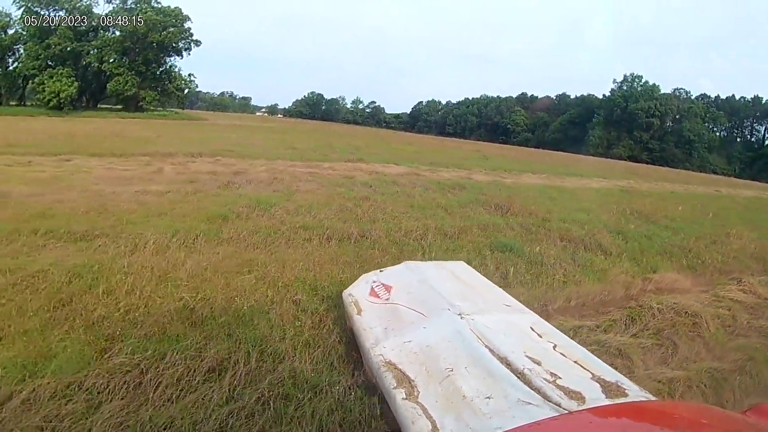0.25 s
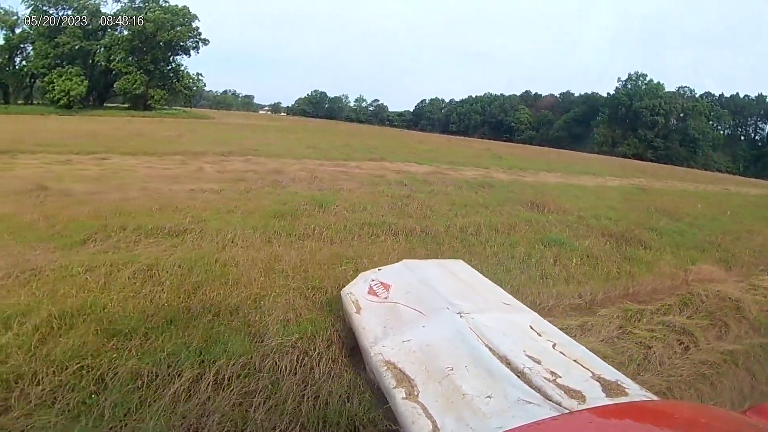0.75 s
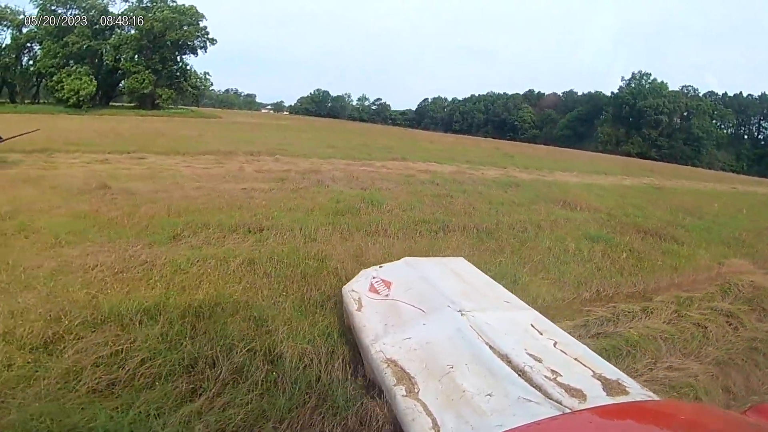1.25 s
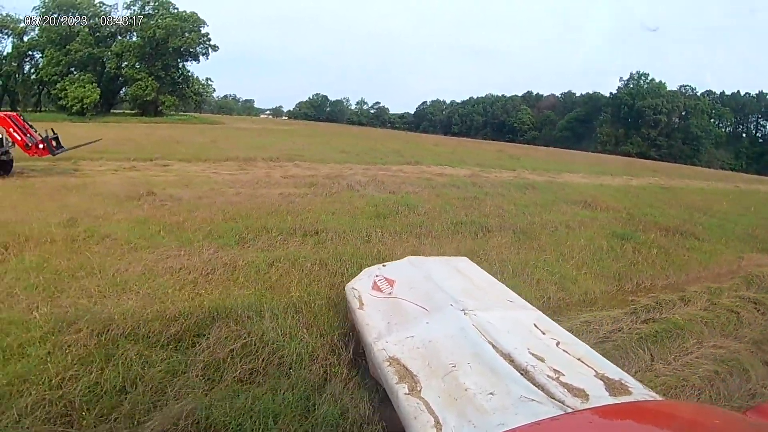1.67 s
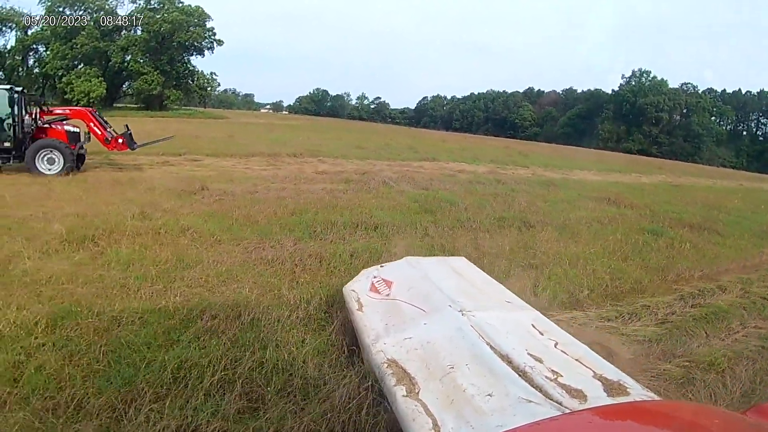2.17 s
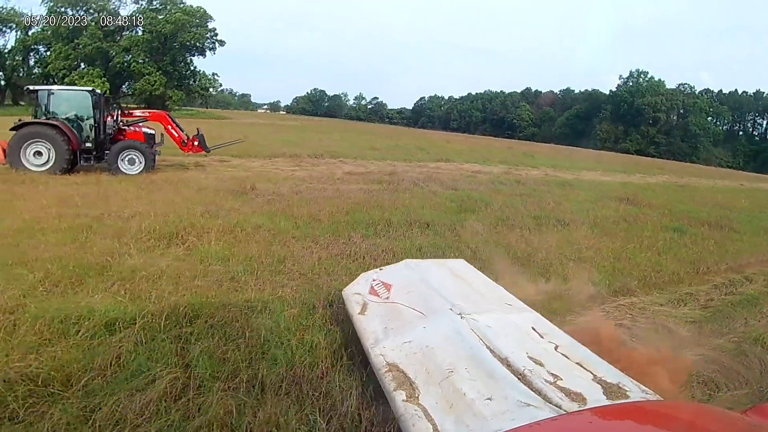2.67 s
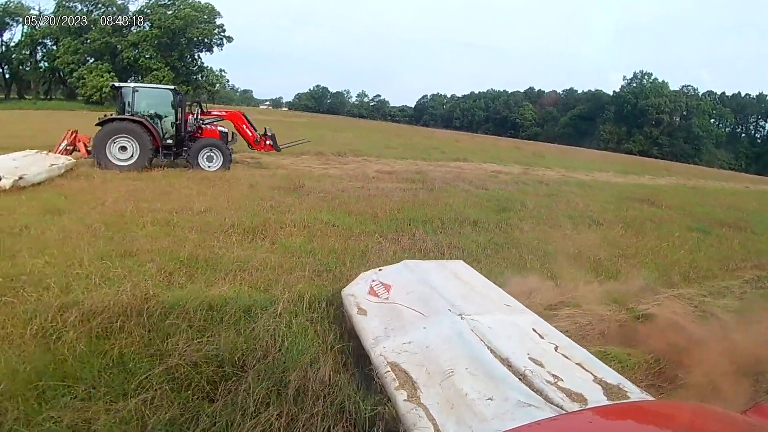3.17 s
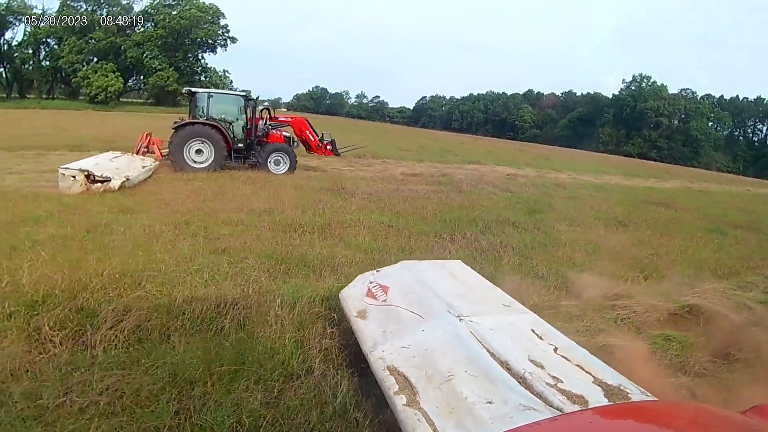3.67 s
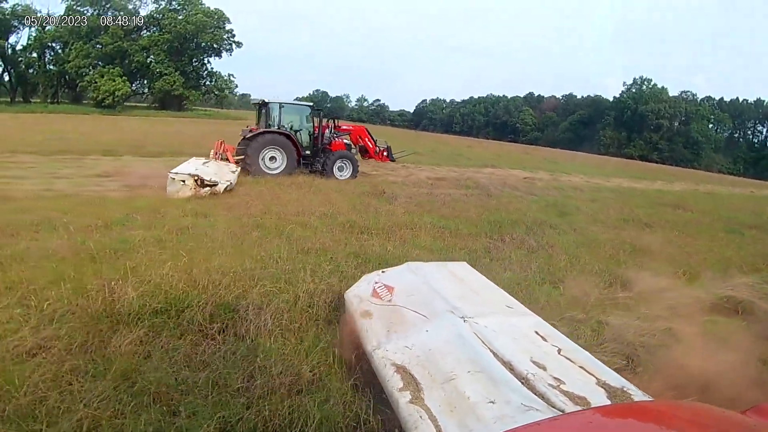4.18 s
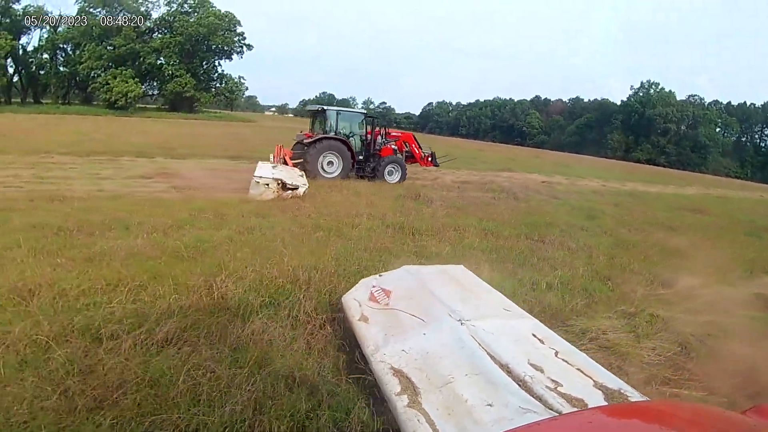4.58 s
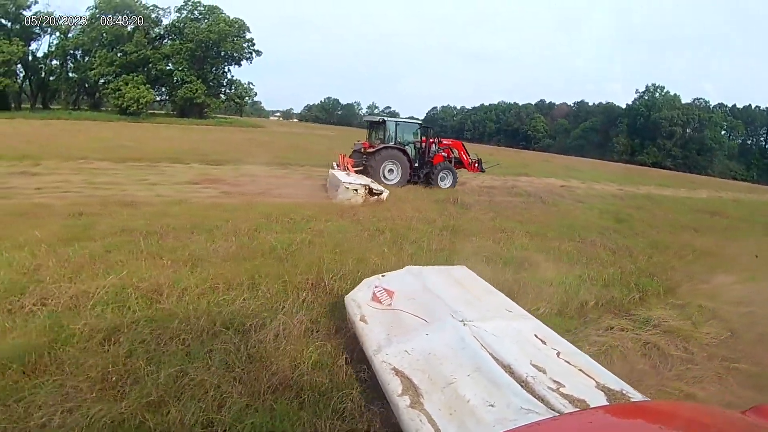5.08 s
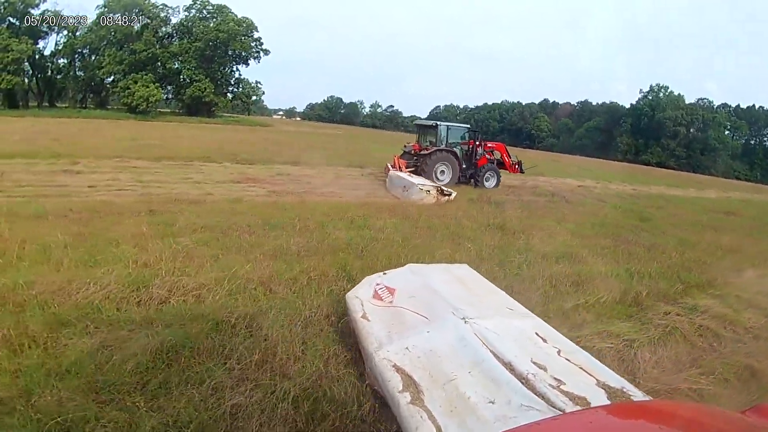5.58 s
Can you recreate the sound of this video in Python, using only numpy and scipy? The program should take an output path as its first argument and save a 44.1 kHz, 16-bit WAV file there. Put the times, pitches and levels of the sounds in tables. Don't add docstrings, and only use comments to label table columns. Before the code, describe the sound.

Constant muffled drone and steady gear whine of a tractor-drawn disc mower cutting hay, with low hood booms and chassis rumbles throughout.

```python
import sys
import numpy as np
from scipy import signal
from scipy.fft import rfft, irfft, next_fast_len
from scipy.io import wavfile
from scipy.ndimage import uniform_filter1d

SR = 44100
rng = np.random.default_rng(int(sys.argv[2]) if len(sys.argv) > 2 else 0)


def put_to_file(sound):
    columns = np.atleast_2d(sound).T
    safe = np.clip(columns, -1, 1)
    whole_steps = np.round(safe * 32767)
    wavfile.write(sys.argv[1], SR, whole_steps.astype(np.int16))


def magnitude_from_level(level_db):
    exponent = np.asarray(level_db, float) / 20
    return 10 ** exponent


N = 257544

NOMINAL_HZ = 911.1
CYCLE_HZ, DISC_HZ, MESH_HZ = 16.605, 45.29, 455.55
BLOCK_S, FIRST_S = 1024 / 48000, .0015


def curve(table):
    s, value = np.transpose(table)
    return np.interp(np.arange(N) / SR, s, value)


def walk(rate):
    held = np.repeat(rng.standard_normal(int(N / SR * 12) + 2), 16)
    smooth = 1.254 * uniform_filter1d(uniform_filter1d(held, size=16), size=16)
    return np.interp(np.arange(N) * (16 * min(rate, 12) / SR), np.arange(len(smooth)), smooth)


def shaped(gain):
    size = next_fast_len(N)
    hz = np.maximum(np.fft.rfftfreq(size, 1 / SR), 1)
    spectrum = rfft(rng.standard_normal(size)) * gain(hz)
    return irfft(spectrum, size)[:N] * np.sqrt(SR / 2)


def coloured(points):
    hz, db = np.transpose(points)
    return shaped(lambda f: magnitude_from_level(np.interp(np.log(f), np.log(hz), db)))


def ringing(hz, width):
    x = shaped(lambda f: 1 / (1 + (2 * (f - hz) / width) ** 2))
    return x / np.std(x)


def played(x, steady):
    envelope = np.abs(signal.hilbert(x)) + 0.043
    return np.sqrt(2) * x / envelope ** np.clip(steady, 0, 1)


def swells(jolts, rest_db):
    swell_s = .042
    t = np.arange(0, N + 100, 100) / SR
    bells = sum(magnitude_from_level(2 * db) * np.exp(-((t - s) / swell_s) ** 2) for s, db in jolts)
    power = magnitude_from_level(2 * rest_db) + bells
    return np.interp(np.arange(N) / SR, t, np.sqrt(power))


def tone(turns, hz, db, wander_db, slip):
    phase = 2 * np.pi * (hz * turns + rng.random()) + slip * walk(6)
    return np.sqrt(2) * magnitude_from_level(db + wander_db * walk(5.133)) * np.sin(phase)


def cutting(turns, sag_hz):
    # (frequency [Hz], density [dB per Hz])
    rush = [(15, -51), (30, -52), (58, -56), (84, -52.5), (100, -46.5), (190, -54.5), (420, -51),
            (620, -56), (800, -58), (1700, -66), (2200, -73.5), (3000, -83.5), (4000, -90), (5000, -106)]
    # (frequency [Hz], width [Hz], level [dB])
    panel_rings = [(171.8, 13, -35), (219.2, 52, -31), (282, 43, -30.5), (370, 270, -47), (450, 60, -45.5),
                   (496.4, 79, -33.5), (840.4, 4.3, -42.5), (938.5, 46, -38), (1087, 120, -41.5),
                   (1284, 74, -43), (1390, 87, -52), (1770, 23, -49.5), (3780, 630, -60),
                   (4720, 1100, -72.5)]
    beat = 1 + 0.074 * np.sin(2 * np.pi * 2 * CYCLE_HZ * turns)
    panels = sum(magnitude_from_level(db + 1.4 * walk(3.7)) * ringing(hz, width) for hz, width, db in panel_rings)
    flicker_db = 0.93 * walk(10)
    thick_hay_db = .2 * sag_hz
    return (beat * coloured(rush) + panels) * magnitude_from_level(flicker_db + thick_hay_db - 1.11)


def chassis():
    # (time [s], level [dB])
    chassis_jolts = [(0.19, -23.7), (0.73, -19), (0.94, -19), (1.04, -17.5), (1.56, -25), (1.69, -25.5),
                     (2.8, -22), (2.96, -23), (3.41, -26.5), (3.81, -19), (4.34, -31), (4.46, -20),
                     (5.09, -19), (5.46, -15), (5.67, -16), (5.78, -15.5)]
    drumming = magnitude_from_level(-2.5) * played(ringing(149, 9.9), steady=.9)
    rumble = magnitude_from_level(-14) * ringing(29, 18)
    return (drumming + rumble) * swells(chassis_jolts, rest_db=-33)


def hood():
    # (time [s], level [dB])
    hood_jolts = [(0.26, -19), (0.38, -19.5), (0.45, -19), (0.59, -17.5), (1.0, -19), (1.42, -16.5),
                  (1.58, -15.5), (2.1, -20), (2.38, -13.5), (2.56, -24.5), (2.65, -13.5), (2.82, -15.5),
                  (3.09, -17.5), (3.35, -15.5), (3.52, -20), (3.66, -18), (3.78, -17.5), (3.94, -14.5),
                  (4.27, -19), (4.59, -21.5), (4.65, -24.5), (4.83, -19), (4.93, -18), (5.01, -16.5),
                  (5.36, -15.5), (5.78, -21)]
    boom = played(ringing(104, 11), steady=0.73)
    return magnitude_from_level(-1.0) * boom * swells(hood_jolts, rest_db=-26)


def engine(turns, sag_hz):
    # (multiple of the engine cycle [-], level [dB])
    engine_tones = [(2, -44.6), (3, -53.7), (4, -35.2), (5, -48.3), (7, -47.5), (8, -25.8), (9, -33.2),
                    (10, -25.8), (12, -26.9), (13, -39.5), (14, -39.2), (17, -37.1), (20, -44.3),
                    (22, -41.6), (24, -37.2), (26, -42.3), (28, -46.3), (33, -45.4), (36, -45.7),
                    (52, -45.0), (60, -48.0), (62, -45.0), (80, -56.5), (84, -54.4), (88, -55.3),
                    (92, -48.0), (102, -62.5), (112, -63.7), (126, -68.1), (128, -68.3)]
    firing = sum(tone(turns, k * CYCLE_HZ, db, wander_db=1.2 + 0.04 * k, slip=.25 + 0.011 * k)
                 for k, db in engine_tones)
    timing_db = -41.5 - .9 * sag_hz - 1.0 * np.arange(N) / SR
    timing = tone(turns, 96 * CYCLE_HZ, timing_db, wander_db=1.8, slip=0.8)
    pump_db = -41.5 + 1.3 * sag_hz
    pump = tone(turns, 46 * CYCLE_HZ, pump_db, wander_db=2.2, slip=.9)
    return magnitude_from_level(-0.45) * firing + timing + pump


def mower(turns, load_db):
    # (multiple of the disc turn [-], level [dB])
    disc_tones = [(3, -37.1), (5, -31.4), (6, -40.1), (7, -28.0), (8, -39.7), (9, -43.9), (13, -45.3),
                  (14, -45.2)]
    # (frequency [Hz], level [dB])
    side_tones = [(417.4, -42), (437.3, -48), (473.7, -44), (493.3, -34), (873, -47), (892.9, -52),
                  (928.8, -38), (948.9, -44), (1366.65, -45), (1384.6, -55), (1822.2, -52), (1629.8, -58)]
    # (frequency [Hz], level [dB])
    shaft_tones = [(18.22, -41.5), (97.6, -36), (341.8, -44), (783.3, -48), (849.2, -44), (865.4, -41)]
    mesh_db = -20.5 + 1.1 * load_db + 1.5 * walk(11)
    octave_db = -24.5 + 0.99 * load_db + 0.77 * walk(11)
    mesh = tone(turns, MESH_HZ, mesh_db, wander_db=.9, slip=0.14)
    octave = tone(turns, 2 * MESH_HZ, octave_db, wander_db=1.12, slip=0.077)
    discs = sum(tone(turns, k * DISC_HZ, db, wander_db=0.4, slip=0.61) for k, db in disc_tones)
    gears = sum(tone(turns, hz, db, wander_db=3.0, slip=1.2) for hz, db in side_tones + shaft_tones)
    return mesh + octave + magnitude_from_level(-0.5) * discs + magnitude_from_level(-0.6) * gears


def scene():
    # (time [s], second mesh harmonic [Hz])
    speed = [(0, 911.7), (0.5, 912.3), (0.85, 911.6), (1.15, 908.6), (1.5, 912.3), (1.85, 909),
             (2.11, 906.8), (2.3, 909), (2.55, 906.6), (3.09, 912.3), (3.25, 910.5), (3.42, 903.3),
             (3.79, 911.5), (4.3, 911.6), (4.55, 914), (5.0, 913.6), (5.35, 915), (5.84, 913.1)]
    # (time [s], level [dB])
    tooth_load = [(0, 0), (0.4, -.5), (1.0, -0.2), (1.3, -1.5), (1.6, 0), (2.2, 0), (2.6, 1), (3.0, -0.7),
                  (3.75, 0.6), (4.2, -2), (4.9, -0.9), (5.5, -2), (5.84, -1.3)]
    speed_hz, load_db = curve(speed), curve(tooth_load)
    turns = np.cumsum(speed_hz / NOMINAL_HZ) / SR
    sag_hz = np.maximum(NOMINAL_HZ - speed_hz, 0)
    bodywork = chassis() + hood()
    return (cutting(turns, sag_hz) + bodywork + engine(turns, sag_hz) + mower(turns, load_db))[None]


def thinned(x, top_gain, from_hz, full_hz, top_hz, keep, holes):
    hop = round(BLOCK_S * SR)
    lead = hop - round(FIRST_S * SR)
    n, k = np.arange(2 * hop), np.arange(hop)
    window = np.sin(np.pi * (n + .5) / (2 * hop))
    basis = window * np.cos(np.pi / hop * np.outer(k + .5, n + .5 + hop / 2))
    padded = np.pad(x, (lead, SR), "reflect")
    halves = padded[:(len(top_gain) + 1) * hop].reshape(-1, hop)
    cells = np.hstack([halves[:-1], halves[1:]]) @ basis.T
    hz = (k + .5) * SR / (2 * hop)
    depth = np.clip(np.log(hz / from_hz) / np.log(full_hz / from_hz), 0, 1)
    nearby = uniform_filter1d(cells ** 2, size=16, axis=1)
    strong = cells ** 2 > keep * depth * nearby
    luck = uniform_filter1d(rng.standard_normal((len(cells), hop // 8 + 1)), size=2, axis=0)
    kept = np.repeat(luck, 8, axis=1)[:, :hop] > holes * depth - 3
    treble = np.where(hz > top_hz, top_gain[:, None], 1)
    blocks = (cells * strong * kept * treble) @ basis * (2 / hop)
    silent = np.zeros(hop)
    joined = np.vstack([blocks[:, :hop], silent]) + np.vstack([silent, blocks[:, hop:]])
    return joined.ravel()[lead:][:N]


def roll_off(x):
    return signal.sosfilt(signal.butter(12, 15800, fs=SR, output="sos"), x)


def record(dry):
    # (time [s], level [dB])
    top_dips = [(0.002, -20), (0.151, -6), (0.535, -18), (0.62, -16), (1.111, -19), (1.388, -17),
                (3.137, -21), (3.201, -17), (3.415, -17), (3.543, -18), (4.353, -20), (4.375, -28),
                (4.46, -18), (4.545, -5), (5.591, -5), (5.761, 4), (5.783, 5)]
    # (frequency [Hz], density [dB per Hz])
    recorder_hiss = [(3500, -120), (5200, -106), (7400, -106), (7560, -124), (7840, -124), (8000, -99.5),
                     (9500, -101), (15000, -102)]
    seams = np.arange(FIRST_S, N / SR + 2 * BLOCK_S, BLOCK_S)
    chance = rng.standard_normal((len(seams), 2))
    top_gain = magnitude_from_level(-1.2 * np.maximum(chance[:, 1], 0) ** 2)
    for s, db in top_dips:
        top_gain[round((s - FIRST_S) / BLOCK_S)] = magnitude_from_level(db) * (db > -15)
    sound = np.tanh(0.48 * dry[0]) / 0.44 + coloured(recorder_hiss)
    packed = thinned(sound, top_gain, from_hz=1300, full_hz=3300, top_hz=4100, keep=2.35, holes=2.0)
    clicks = np.zeros(N + SR)
    clicks[(seams * SR).astype(int)] = magnitude_from_level(-38) * np.tanh(2 * chance[:, 0]) * top_gain
    tick_band = signal.butter(2, [5000, 7400], "band", fs=SR, output="sos")
    ticks = signal.sosfilt(tick_band, clicks[:N])
    return roll_off((packed + ticks)[None])


dry = scene()
out = record(dry)
put_to_file(out)
```